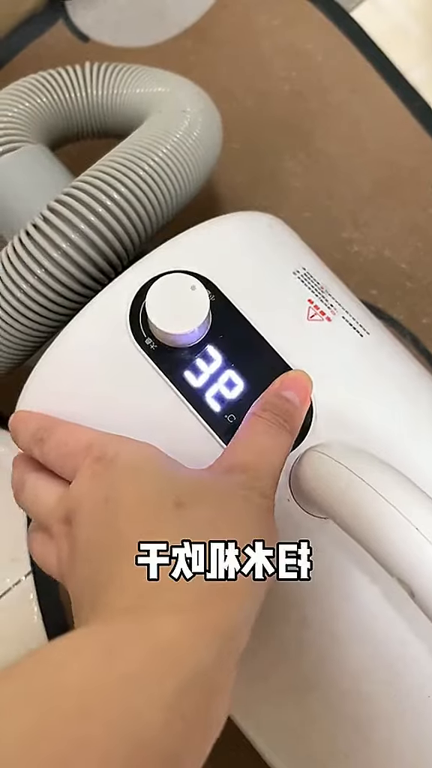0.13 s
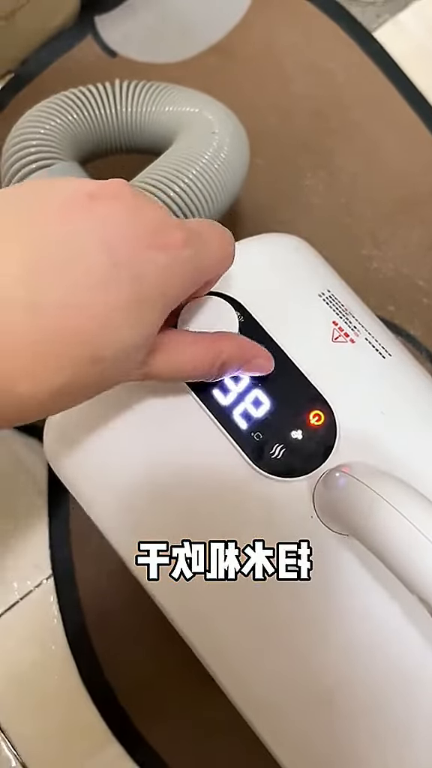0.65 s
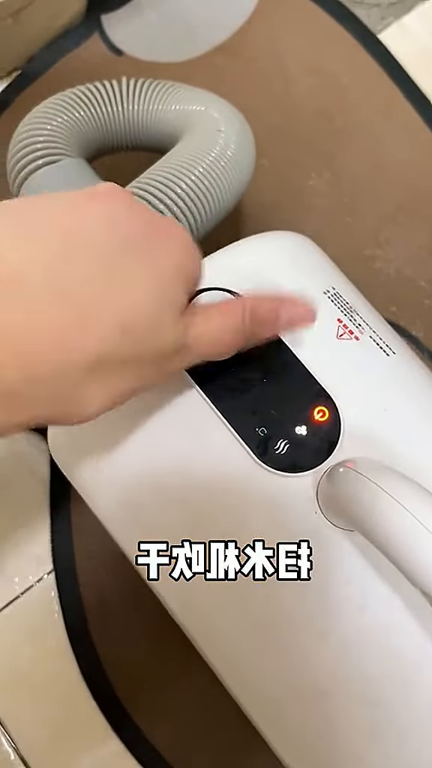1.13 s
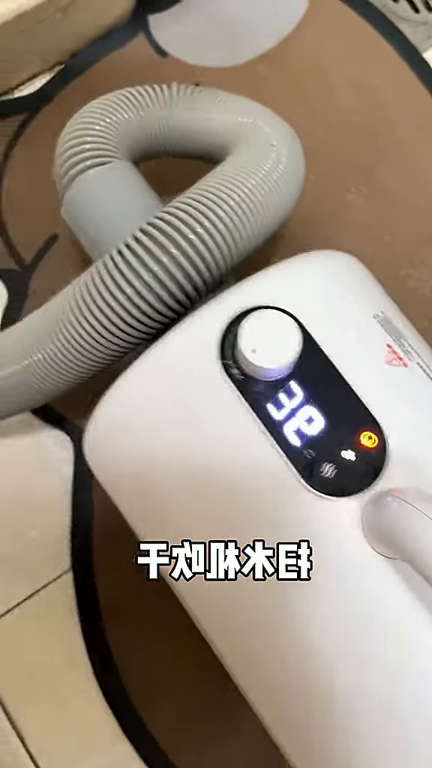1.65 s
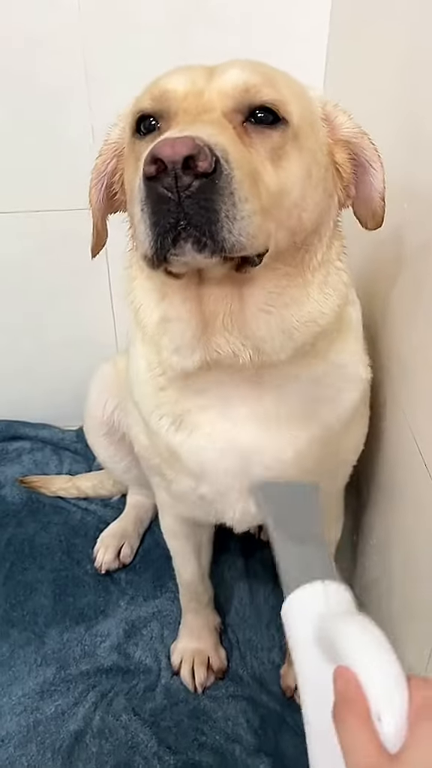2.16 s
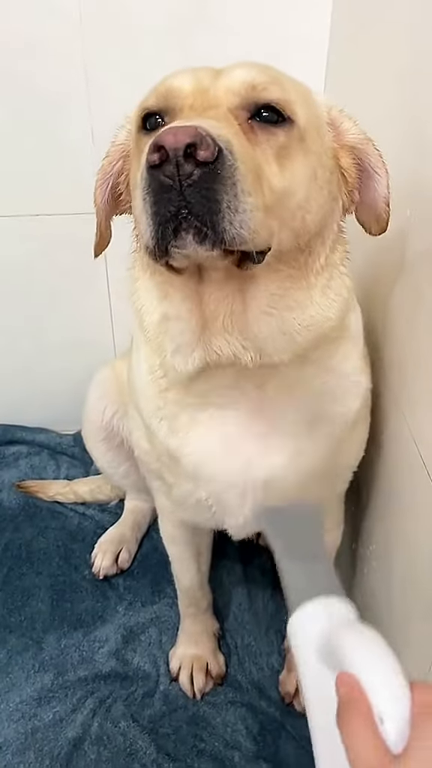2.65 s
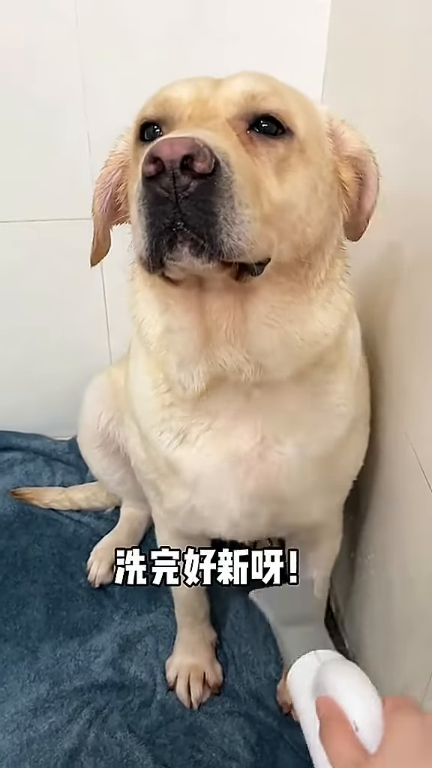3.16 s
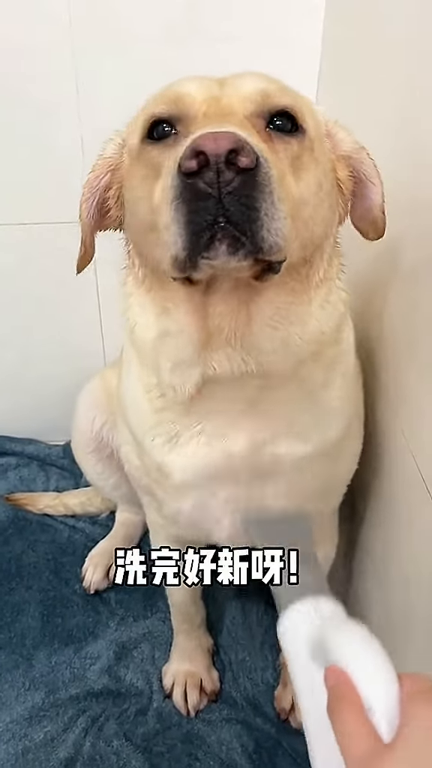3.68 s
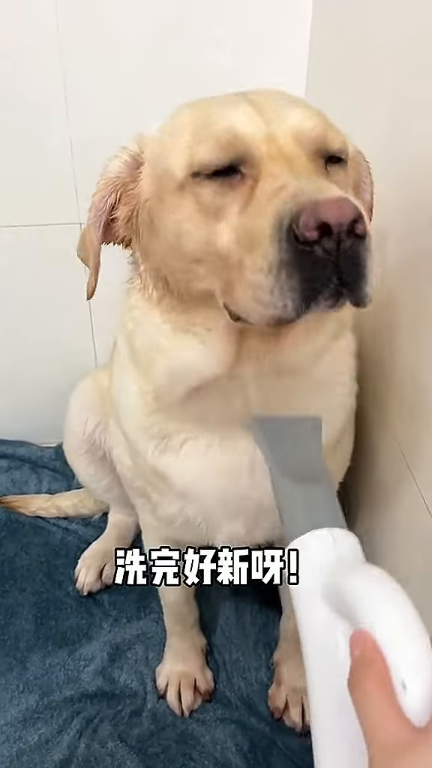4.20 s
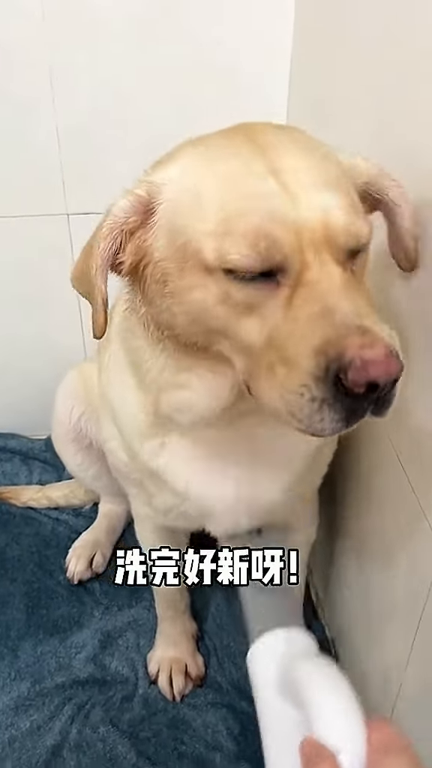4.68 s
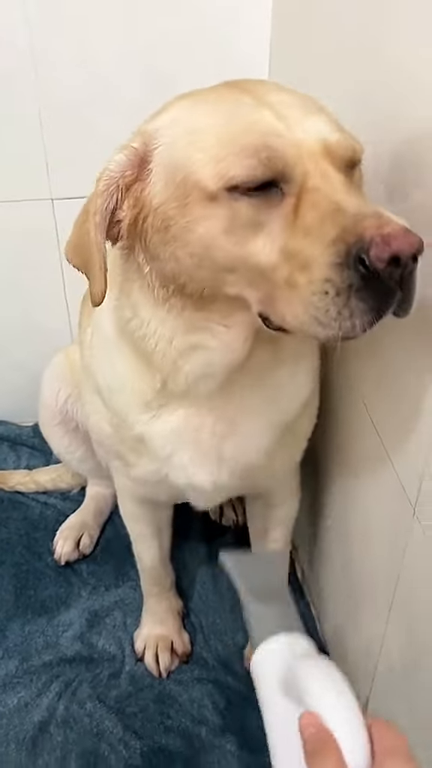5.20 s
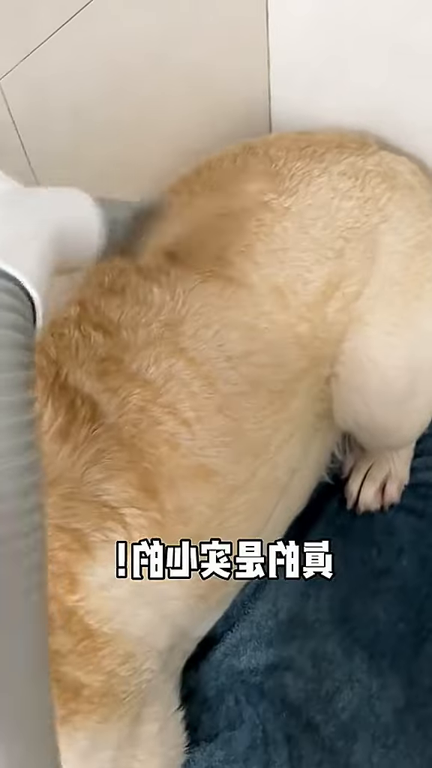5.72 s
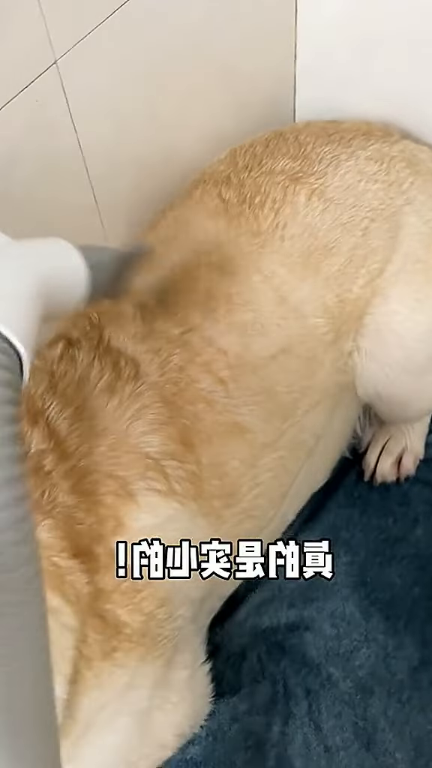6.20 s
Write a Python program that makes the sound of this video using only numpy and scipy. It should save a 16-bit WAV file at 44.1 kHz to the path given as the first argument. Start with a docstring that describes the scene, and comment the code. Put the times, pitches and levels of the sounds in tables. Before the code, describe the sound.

A pet dryer is already blowing in a small tiled bathroom. Low hose roar, breathy rush and hiss mix with a mid-pitched motor hum and a thin, high blade whine. The air swells in quick uneven strokes over a dog's coat. The tone shifts abruptly twice as the close microphone changes place; finally the strokes stop, leaving surging low roar and strong whine.

```python
"""A pet blow dryer runs in a small tiled bathroom, heard from three places one after another.
First air roars in casing and hose, the shaft hums, nine blades whine; the jet rushes and hisses,
nearing and turning away, swelling as the nozzle sweeps over a dog's coat.
At the second place the strokes go on and a breathy hose tone grows just above the hum.
At the third the strokes cease; the low roar surges and the whine stays strong."""
import sys
import numpy as np
from scipy import signal
from scipy.fft import rfft, irfft, next_fast_len
from scipy.io import wavfile
from scipy.ndimage import uniform_filter1d

SR = 44100
rng = np.random.default_rng(int(sys.argv[2]) if len(sys.argv) > 2 else 0)


def makeup_ratio(level_db):
    """Linear amplitude ratio for a level in decibels (20 dB per factor of ten)."""
    decades = np.asarray(level_db, float) / 20
    return 10 ** decades


def store_pcm(level_fs):
    """Save levels as 16-bit WAV."""
    pcm = np.round(np.clip(level_fs, -1, 1) * 32767).astype(np.int16)
    wavfile.write(sys.argv[1], SR, np.atleast_2d(pcm).T)


N = 279657


def walk(n, rate_hz):
    """Random levels held 1 / rate_hz and slewed twice; spread near 1."""
    hold = int(SR / rate_hz)
    steps = np.repeat(rng.standard_normal(n // hold + 1), hold)
    slewed = uniform_filter1d(uniform_filter1d(steps, hold), hold)
    return 1.11 * slewed[:n]


def columns(table, t):
    """Columns of a curve table, interpolated at times t."""
    knot_s, *values = np.transpose(table)
    return [np.interp(t, knot_s, column) for column in values]


def swells(table, t, sigma_s):
    """Each row adds a bell-shaped lift in dB around its moment, column by column."""
    centre_s, *lifts_db = np.transpose(table)
    grid_s = t[::64]
    bells = np.exp(-.5 * ((grid_s[:, None] - centre_s) / sigma_s) ** 2)
    return [np.interp(t, grid_s, bells @ lift_db) for lift_db in lifts_db]


# mean air level, one row per place: rumble/dB, roar/dB, rush/dB, hiss/dB, top hiss/dB
AIR_LEVELS_DB = [(-61.5, -44.5, -46, -45, -52.5), (-57.5, -52, -45.5, -42, -50),
                 (-54, -47.5, -50.5, -43.5, -50)]
# jet nears and turns away, first place: t/s, level/dB
JET_AIM = [(0, -3.5), (.1, -1), (.42, -2.5), (.55, 0), (1.3, 1), (1.8, 0), (2.2, -1), (2.55, -3),
           (2.77, -2)]
# nozzle strokes over the coat, negative = dip: t/s, rush lift/dB, hiss lift/dB
COAT_STROKES = [(.109, 2, 2), (.225, 2, 1.5), (.31, 2, 2), (.485, 3.5, 2), (.69, 2, 2), (.82, 4, 1.5),
                (.92, 2, 0), (1.03, 2, 1), (1.2, 1.5, 0), (1.315, 3.5, 0.5), (1.51, -2.5, -2),
                (1.6, 1.5, 0), (1.692, 6.5, 1), (1.83, 3, .5), (1.95, 2, 0.5), (2.381, 7, 2),
                (2.707, 6, 0.5), (2.862, 1.5, 2.5), (3.02, 0.5, 2), (3.15, 4, 2), (3.25, 1, 1.5),
                (3.345, 0.5, 2), (3.42, 4.5, 1.5), (3.574, 0, 3), (3.625, 4.5, 0), (3.78, 1.5, 2.5),
                (3.825, 4, -0.5), (3.9, 0.5, 1), (4.018, 1.5, 3), (4.13, 2, 2), (4.255, 0, 4),
                (4.31, 4, -1), (4.381, .5, 2.5), (4.512, 0.5, 2), (4.64, 1, 2.5), (4.76, 5.5, 2),
                (4.89, -1, 1), (4.99, 4, 3.5), (5.152, 0, 2.5), (5.25, 2, 3), (5.32, 3, 0.5)]
# low roar surges or sags: t/s, level/dB
ROAR_SURGES = [(.08, 1.5), (.19, -3), (.8, 2), (.87, -4), (1.125, 2.5), (1.51, -4), (2.52, -2.5),
               (2.694, 2), (3.741, 7), (3.968, 4.5), (4.209, 5), (4.422, 3.5), (5.07, 4.5), (5.45, 1.5),
               (5.575, 9), (5.875, 8), (6.11, 2.5), (6.24, 2)]


def air_levels(t, place):
    """Jet aim and strokes move rush and hiss; surges move the roar and slightly oppose the hiss."""
    rumble_db, roar_db, rush_db, hiss_db, top_db = AIR_LEVELS_DB[place]
    jet_db = columns(JET_AIM, t)[0] * (place == 0)
    stroke_rush_db, stroke_hiss_db = swells(COAT_STROKES, t, sigma_s=.03)
    surge_db, = swells(ROAR_SURGES, t, sigma_s=.032)
    # factors: dB per dB
    return [np.full(len(t), rumble_db),
            roar_db + surge_db,
            rush_db + 1.25 * jet_db + stroke_rush_db,
            hiss_db + .77 * jet_db + stroke_hiss_db - .2 * surge_db,
            top_db + jet_db + 1.35 * stroke_hiss_db]


# air spectrum shape per place, relative (band levels set later): f/Hz, level/dB
COLOUR_A = [(25, -99), (60, -75), (200, -59.5), (480, -61.5), (900, -68), (2400, -72.5), (3000, -71),
            (4400, -73.5), (5300, -75.5), (6300, -84.5), (7000, -77), (7700, -83.5), (8400, -90.5),
            (8650, -103), (9100, -106)]
COLOUR_B = [(25, -90), (60, -68.5), (100, -63), (200, -60), (500, -62), (1100, -72.5), (1600, -71),
            (2500, -71), (4200, -69.5), (4600, -70.5), (6500, -72.5), (7500, -77.5), (8200, -103),
            (9100, -104)]
COLOUR_C = [(25, -100), (60, -70.5), (130, -60), (340, -63), (400, -62), (700, -69.5), (1000, -65),
            (3500, -81), (4400, -81), (5200, -77), (5600, -85.5), (6300, -87), (6900, -81.5), (7500, -86),
            (8600, -99), (8750, -110), (9100, -112)]
# hose and room resonances: f/Hz, width/Hz, lift/dB at first, second, third place
HOSE_ROOM_MODES = [(80, 10, 2, 7, 0), (98, 7.6, -0.5, 3, 4), (133, 7.5, -1, 6, 3), (153, 19, -3.5, 2, 3.5),
                   (235.4, 20.6, 5.5, 9, 11.5), (279, 30, 1, 5.5, 7.5), (333.5, 28.5, 4, 10, 2),
                   (401, 25, 3.5, 0, -3.5), (437, 25, -2.5, 9, 1.5), (487, 35, 5, 2, 1),
                   (562, 18, 0.5, 3.5, 6), (610, 12, -3.5, -1, 8.5), (683, 23, -10, 5, -6),
                   (1130, 170, 0, 3.5, -3), (1400, 60, 0, 0.5, -2), (2750, 91, 1, 0.5, 1),
                   (3580, 350, 1, 0, 4)]


def colour(place, hz):
    """Amplitude gain of the air noise: broad colour, Gaussian lift or dip in dB at each resonance."""
    knot_hz, knot_db = np.transpose([COLOUR_A, COLOUR_B, COLOUR_C][place])
    db = np.interp(np.log(hz + 1), np.log(knot_hz), knot_db)
    for centre_hz, width_hz, *lift_db in HOSE_ROOM_MODES:
        db = db + lift_db[place] * np.exp(-.5 * ((hz - centre_hz) / (.5 * width_hz)) ** 2)
    return makeup_ratio(db)


# bands of rumble, roar, rush, hiss, top hiss: low f/Hz, high f/Hz
AIR_BANDS = [(40, 110), (150, 520), (650, 1700), (2000, 4700), (5000, 7600)]


def air(levels_db, gain, hz):
    """Turbulent air in third-octave bands: all flutter together and each flickers alone."""
    shared_db, flicker_db, buffet_db = -.73, .5, .5
    n = len(levels_db[0])
    buffeted = rng.standard_normal(n) * makeup_ratio(buffet_db * walk(n, 300))
    noise = rfft(buffeted) * gain
    power = gain ** 2 * 2 / n
    # level wanted over level of the coloured noise, per air band
    excess_db = []
    for level_db, (low_hz, high_hz) in zip(levels_db, AIR_BANDS):
        inside = (hz > low_hz) & (hz < high_hz)
        excess_db.append(level_db - 10 * np.log10(power[inside].sum()))
    anchors = [np.log2(low_hz * high_hz) / 2 for low_hz, high_hz in AIR_BANDS]
    together = walk(n, 14)
    octave = np.log2(hz + 1)
    out = 0
    for centre in np.arange(13, 41) / 3:  # log2 Hz
        share = np.cos(np.pi / 2 * np.clip(3 * (octave - centre), -1, 1)) ** 2
        weights = [np.interp(centre, anchors, row) for row in np.eye(len(AIR_BANDS))]
        db = np.dot(weights, excess_db) + shared_db * together + flicker_db * walk(n, 13.15)
        out = out + makeup_ratio(db) * irfft(noise * share, n)
    return out


# intermittent treble bands: place index, low f/Hz, high f/Hz, share of time open
TREBLE_GAPS = [(0, 5645, 6070, .3), (0, 5790, 6230, .2), (0, 6400, 6400, 0.97), (0, 8270, 8500, .8),
               (0, 8480, 9300, .45), (1, 7540, 7840, .12), (1, 7820, 8340, .02), (1, 8050, 9350, .7),
               (2, 5650, 5800, .3), (2, 5700, 6310, .001), (2, 6250, 6650, .7), (2, 8600, 9300, .3)]


def thin(x, place):
    """Grainy noise in small patches of pitch and time; treble bands come and go in short spells."""
    hz, _, cells = signal.stft(x, SR, nperseg=1024, noverlap=768)
    frames = cells.shape[1]
    patches = uniform_filter1d(rng.standard_normal(cells.shape), size=6, axis=1)
    spread_db = np.interp(hz, [0, 700, 5000, 6500], [0, 3.5, 3.5, 5])
    cells = cells * makeup_ratio(patches / patches.std() * spread_db[:, None])
    for gap_place, low_hz, high_hz, share in TREBLE_GAPS:
        if gap_place == place:
            chance = np.repeat(rng.random(frames // 8 + 1), 8)[:frames]
            is_open = uniform_filter1d(1. * (chance < share), size=3)
            cells[(hz > low_hz) & (hz <= high_hz)] *= is_open
    return signal.istft(cells, SR, nperseg=1024, noverlap=768)[1][:len(x)]


BLADES = 9
# mean shaft speed per place: f/Hz
SHAFT_SPEED_HZ = [540.95, 535.47, 532.93]
# shaft hum: t/s, level/dB
HUM_CURVE = [(0, -45.5), (.5, -49), (.95, -46.5), (1.3, -47.5), (2.1, -48.5), (2.46, -51), (2.7, -63),
             (2.8, -53.5), (3.3, -57.5), (3.6, -65), (4.1, -63), (4.33, -50), (4.6, -54.5), (5.0, -56),
             (5.3, -46), (5.4, -54.5), (5.6, -48.5), (5.75, -51.5), (5.89, -49), (6.05, -51), (6.34, -51)]
# how far the hum comes and goes, per place: level/dB
HUM_SPREAD_DB = [.8, 2.5, .8]
# blade whine, rising and sinking as tile reflections shift: t/s, level/dB
WHINE_CURVE = [(0, -48), (.45, -45), (.68, -47.5), (1.0, -44.5), (1.33, -46.5), (1.51, -51.5),
               (1.61, -42.5), (1.9, -48), (2.0, -46), (2.08, -53), (2.15, -48), (2.22, -52), (2.29, -68),
               (2.44, -64), (2.56, -51), (2.66, -66), (2.75, -49), (2.8, -45), (3.08, -65), (3.14, -54),
               (3.22, -66), (3.3, -62), (3.35, -49), (3.6, -57), (3.67, -66), (3.77, -49), (3.88, -48.5),
               (4.0, -56), (4.12, -53), (4.24, -37.5), (4.45, -50.5), (4.57, -65), (4.82, -42.5),
               (5.1, -44), (5.37, -49), (5.4, -42.5), (5.56, -44), (5.62, -41.5), (6.03, -40.5),
               (6.12, -42.5), (6.22, -39), (6.34, -44.5)]


def motor(t, place):
    """One hum cycle per shaft turn, one whine cycle per passing blade, locked to an unsteady speed."""
    n = len(t)
    hum_db = columns(HUM_CURVE, t)[0] + HUM_SPREAD_DB[place] * walk(n, 24) + 1.3 * walk(n, 20)
    whine_db = columns(WHINE_CURVE, t)[0] + 1.4 * walk(n, 25)
    speed_hz = SHAFT_SPEED_HZ[place] * (1 + .00025 * walk(n, 16))
    turn_rad = 2 * np.pi * np.cumsum(speed_hz) / SR
    hum = makeup_ratio(hum_db) * np.sin(turn_rad)
    whine = makeup_ratio(whine_db) * np.sin(BLADES * turn_rad)
    return np.sqrt(2) * (hum + whine)  # levels are rms


# breathy hose tone, second place: t/s, f/Hz, level/dB
HOSE_TONE_CURVE = [(2.8, 554, -58), (3.3, 545, -62), (4.2, 556, -62), (4.5, 558, -52), (4.8, 556, -54),
                   (5.1, 559, -51), (5.3, 562, -47), (5.37, 556, -55)]


def hose_tone(t):
    """Air in the hose rings one mode: a tone whose size and phase wander like narrow noise."""
    flutter_hz = 14
    hz, db = columns(HOSE_TONE_CURVE, t)
    turn_rad = 2 * np.pi * np.cumsum(hz) / SR
    in_phase = walk(len(t), flutter_hz) * np.sin(turn_rad)
    quadrature = walk(len(t), flutter_hz) * np.cos(turn_rad)
    return makeup_ratio(db) * (in_phase + quadrature)


# listening places: start t/s, end t/s, fade-in/s
LISTENING_PLACES = [(-.1, 2.7745, .02), (2.7745, 5.3745, 0.02), (5.384, 6.5, 0.02)]


def scene():
    """Three places in turn, each cut off sharply and the next faded in."""
    out = np.zeros(N)
    for place, (start_s, end_s, fade_s) in enumerate(LISTENING_PLACES):
        first = max(int(start_s * SR), 0)
        n = next_fast_len(int((end_s - start_s + .05) * SR))
        t = (first + np.arange(n)) / SR
        hz = np.arange(n // 2 + 1) * SR / n
        rush = air(air_levels(t, place), colour(place, hz), hz)
        sound = thin(rush, place) + motor(t, place)
        if place == 1:
            sound = sound + hose_tone(t)
        fade_in = np.clip((t - start_s) / fade_s, 0, 1)
        # faint remainder after the cut, 8 ms decay
        tail = np.where(t < end_s, 1, .17 * np.exp(-np.maximum(t - end_s, 0) / .008))
        tail = uniform_filter1d(tail, size=40)
        out[first:first + n] += (sound * fade_in * tail)[:N - first]
    return out[None]


def band_limit(x):
    """A steep low-pass at the top of the band."""
    return signal.sosfilt(signal.butter(12, 9080, fs=SR, output="sos"), x)


def record(dry):
    """A steep elliptic low-pass at 9100 Hz bounds the top band."""
    low_pass = signal.ellip(8, .2, 40, 9100, fs=SR, output="sos")
    mix = signal.sosfilt(low_pass, dry)
    return band_limit(mix)


dry = scene()
out = record(dry)
store_pcm(out)
```